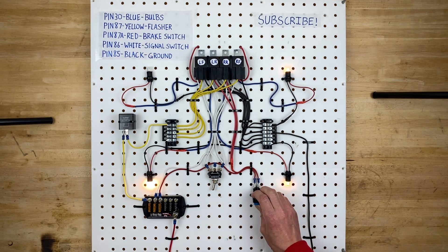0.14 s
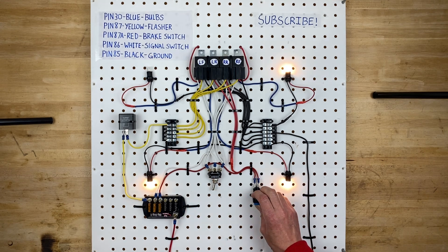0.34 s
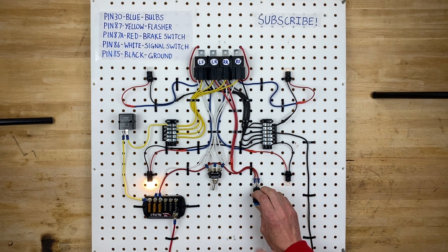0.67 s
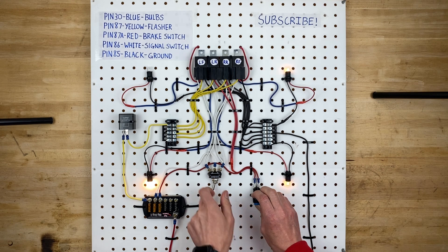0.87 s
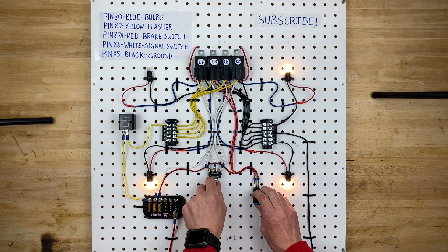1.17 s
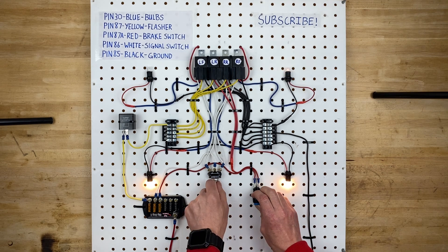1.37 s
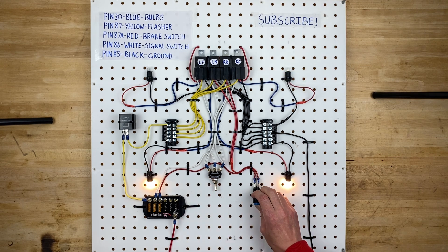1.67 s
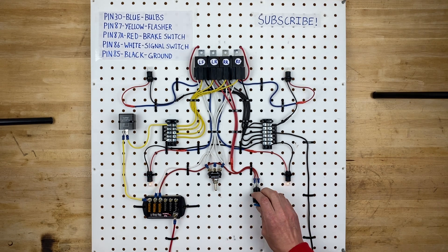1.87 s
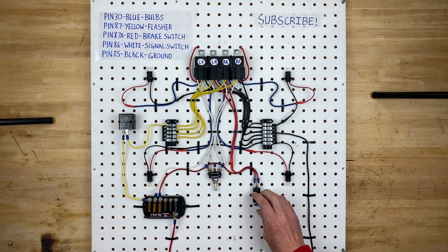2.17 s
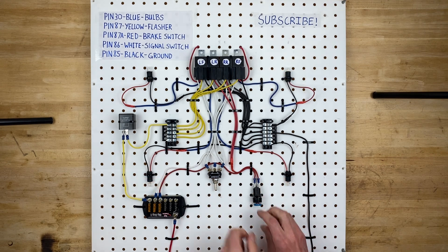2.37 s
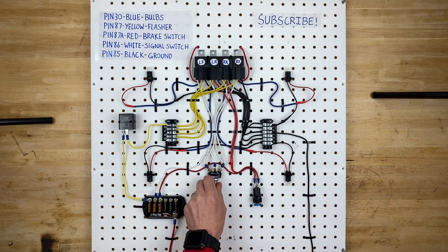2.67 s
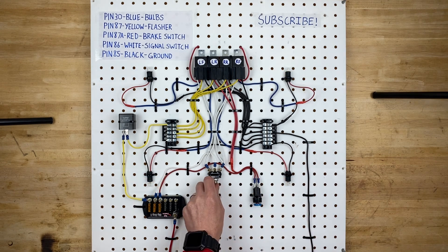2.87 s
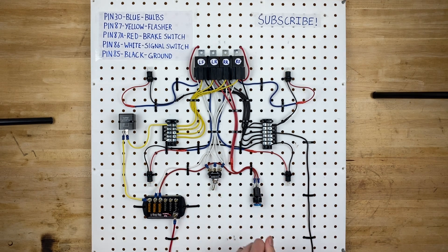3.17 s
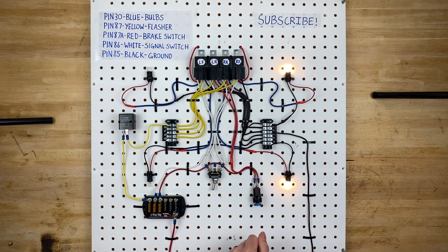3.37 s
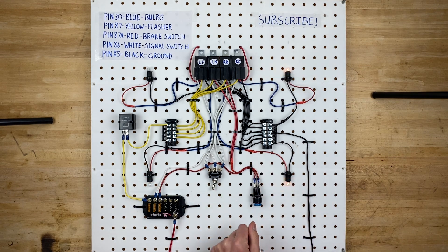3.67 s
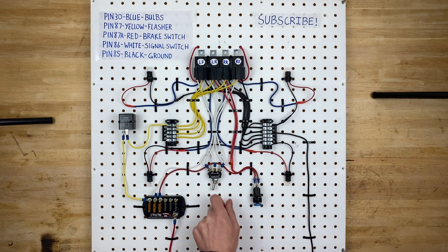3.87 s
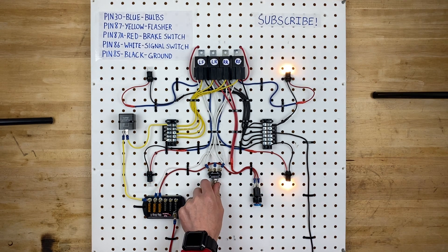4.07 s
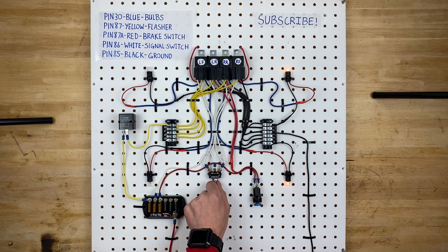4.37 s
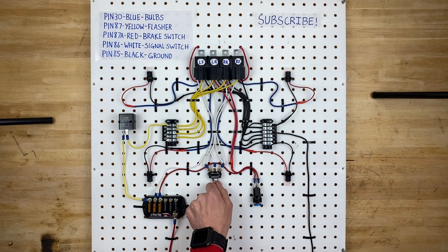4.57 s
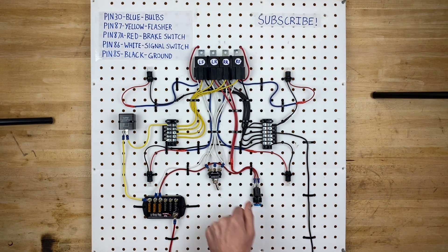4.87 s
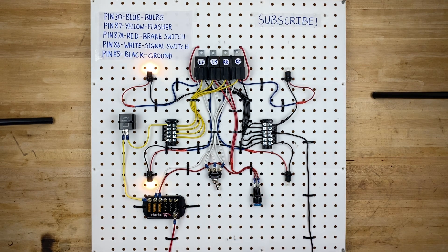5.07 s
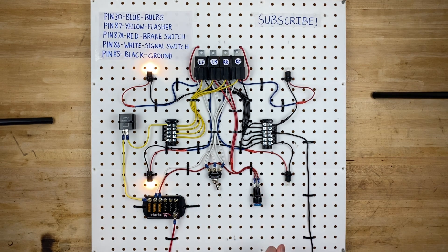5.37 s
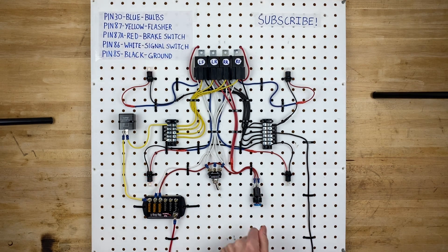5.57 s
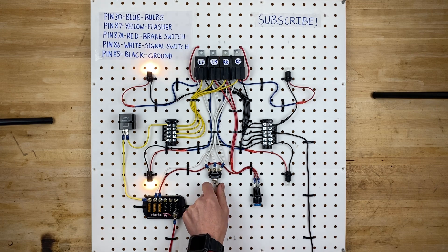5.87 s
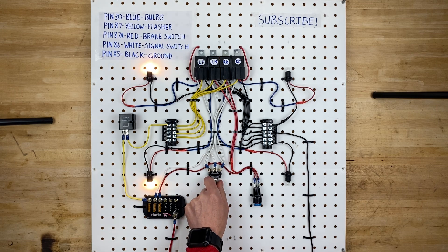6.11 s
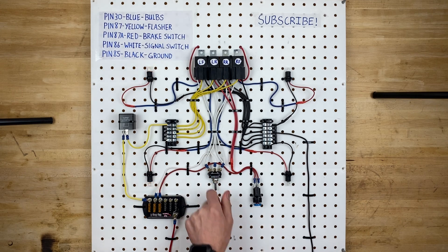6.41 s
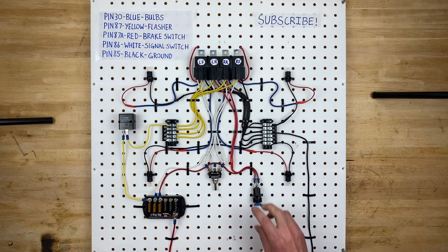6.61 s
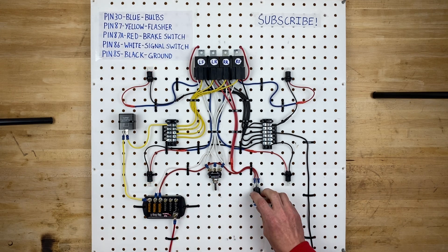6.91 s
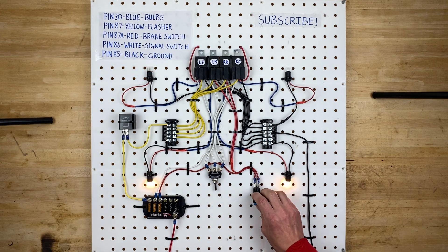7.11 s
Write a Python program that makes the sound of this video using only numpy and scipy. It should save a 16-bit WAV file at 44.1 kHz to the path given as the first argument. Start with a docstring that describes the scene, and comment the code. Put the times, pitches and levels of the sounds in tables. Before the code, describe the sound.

Close-miked wiring board on a bench: soft arm thuds first, then light fingertip knocks and the first crisp, metallic switch clack. More throws follow, each with a slightly different bright ring, a quick pair past the middle and a strongest one late. Small skin scrapes and nail ticks fall between. A faint, rough, very high electrical whine, low air rumble and hiss stay constant in a small quiet room.

```python
"""From the start a mains power supply whines high up, over ventilation rumble and a faint hiss. An arm
leaning on the bench thuds softly at 0.6 s, 0.9 s and 6.7 s. From 1.1 s fingers tap a perforated wiring board.
A metal toggle switch on it is thrown by hand at 1.3, 2.8, 4.4, 4.7 and 6.2 s: each throw makes many decaying
tones ring. The whine is sines swept by a voltage ripple, the air is shaped noise, and a quiet room adds a tail."""
import sys
import numpy as np
from scipy import signal
from scipy.fft import rfft, irfft
from scipy.io import wavfile
from scipy.ndimage import uniform_filter1d

SR = 44100
rng = np.random.default_rng(int(sys.argv[2]) if len(sys.argv) > 2 else 0)


def put_to_file(sound):
    """Save the sound as 16-bit audio at rate SR, in the file named by the first command-line argument."""
    columns = np.atleast_2d(sound).T  # one column per channel
    safe = np.clip(columns, -1, 1)
    whole_steps = np.round(safe * 32767)
    wavfile.write(sys.argv[1], SR, whole_steps.astype(np.int16))


N = 319725


def from_db(db):
    """Turns decibels into an amplitude factor."""
    return 10 ** (np.asarray(db) / 20)


def at_hz(points, hz):
    """Reads a table between its rows, on a log-frequency axis."""
    table = np.array(points)
    return np.interp(np.log(hz), np.log(table[:, 0]), table[:, 1])


# loudness of ventilation rumble and hiss at each pitch: [f/Hz, relative level per Hz/dB]
AIR = [(12, -27), (20, 0), (50, -8), (77, -1.5), (100, -7.5), (140, -9.5), (285, -15.5), (950, -27.5),
       (2000, -35), (4800, -40), (10800, -40), (15000, -43), (16200, -51.5)]
AIR_DB = -65   # rms of the whole


def air():
    """Moving air makes steady noise, here random noise shaped by its spectrum."""
    hz = np.maximum(np.fft.rfftfreq(N, 1 / SR), 1)
    spectrum = rfft(rng.standard_normal(N))
    noise = irfft(spectrum * from_db(at_hz(AIR, hz)) * (hz > 10), N)
    return from_db(AIR_DB) * noise / noise.std()


RIPPLE_HZ, FIRST_CREST_S = 119.967, -.0001
FLAT_TOP = .09   # the mains wave is flattened over this share of a ripple either side of its crest
SAG, HOLD = .55, 0.06   # voltage decay per ripple; share of a ripple before it starts
ROUNDING_S = 0.00027   # the voltage is averaged over this time


def voltage_drop(since):
    """The smoothing capacitor follows the rectified mains up to each crest, then sags until it is recharged."""
    sagging = np.exp(-SAG * np.maximum(since - HOLD, 0))
    mains = np.minimum(np.abs(np.cos(np.pi * since)) / np.cos(np.pi * FLAT_TOP), 1)
    rising_mains = mains * (since > .5)
    drop = 1 - np.maximum(rising_mains, sagging)
    return uniform_filter1d(drop, size=round(ROUNDING_S * SR))


# base pitch of the whine at the ripple crest: [t/s, f/Hz]
CREST_PITCH = [(0, 8815), (1.0, 8823), (3.0, 8805), (4.8, 8785), (5.0, 8820), (5.22, 8960), (5.98, 9005),
               (6.3, 8940), (7.25, 8935)]
# starts of brief dips in pitch, as under a passing load: [t/s]
LOADS = [.39, 1.10, 1.83, 2.50, 3.16, 3.83, 4.52, 5.17, 5.87, 6.60]
LOAD_S, LOAD_DROP_HZ = .085, 67
# chance in the whine's pitch: [spread f/Hz, changes per s]
WAVERS = [(6, 3.1), (14, 150.0)]
SWING_HZ, UNEVEN_HZ = 8580, 75   # pitch lost per unit of voltage drop; up or down on alternate crests
# as charging starts the whine falters and its pitch plunges: centre and width as shares of a ripple
RECHARGE, RECHARGE_WIDTH = .735, .04
RECHARGE_DIP_DB, PLUNGE_HZ = 9.5, 600
# the two whining tones: [f above the sweep/Hz, level at the crest/dB, loss per squared unit of voltage drop/dB]
WHINES = [(0, -57.5, 169.5), (1023, -64.5, 46)]
# thin steady tones: [f/Hz, rms level/dB]
HUM = [(1001, -89.5), (1502, -94.5), (3004, -101)]


def supply():
    """The pitch and loudness of the whine follow the rippling capacitor voltage; steady tones lie beside it."""
    t = np.arange(N) / SR
    turns = (t - FIRST_CREST_S) * RIPPLE_HZ
    since = turns % 1   # share of a ripple gone since its crest
    drop = voltage_drop(since)
    charging = np.exp(-((since - RECHARGE) / RECHARGE_WIDTH) ** 2)

    sweep = np.interp(t, *np.transpose(CREST_PITCH))
    sweep = sweep - LOAD_DROP_HZ * sum((t > s) & (t < s + LOAD_S) for s in LOADS)
    sweep = sweep - UNEVEN_HZ * np.cos(np.pi * turns)   # the two half-waves of the mains differ
    sweep = sweep - SWING_HZ * drop - PLUNGE_HZ * charging
    for spread_hz, rate in WAVERS:
        # 1000 random points; after the last one the value stays put
        waver = np.interp(t * rate, np.arange(1000), rng.standard_normal(1000))
        sweep = sweep + spread_hz * waver

    out = np.zeros(N)
    for hz, db, loss_db in WHINES:
        cycles = np.cumsum(sweep + hz) / SR + rng.random()
        out += from_db(db - loss_db * drop ** 2) * np.sin(2 * np.pi * cycles)
    out *= from_db(-RECHARGE_DIP_DB * charging)
    for hz, db in HUM:
        out += np.sqrt(2) * from_db(db) * np.sin(2 * np.pi * (hz * t + rng.random()))
    return out


def ring(push, hz, t60):
    """A mode: a unit click sets a sine of height 1 ringing, which fades by 60 dB in t60 seconds."""
    r, w = from_db(-60 / (t60 * SR)), 2 * np.pi * hz / SR
    return signal.lfilter([0, np.sin(w)], [1, -2 * r * np.cos(w), r * r], push)


def add(out, s, peak_db, sound):
    """Places a sound at a time; its loudest 3 ms set the approximate peak."""
    i = round(s * SR)
    loudest = 2.5 * np.sqrt(uniform_filter1d(sound ** 2, size=130).max())
    out[i:i + len(sound)] += (from_db(peak_db) * sound / loudest)[:N - i]


# arm leaning on the bench: [t/s, peak level/dB]
THUDS = [(0.609, -48), (0.899, -42.5), (6.669, -50.5)]
BENCH_HZ, BENCH_T60_S = 30, 0.45


def bench():
    """A soft push of the arm sets the bench swinging at one low pitch."""
    out = np.zeros(N)
    push = np.append(np.hanning(600), np.zeros(12000))
    for s, db in THUDS:
        add(out, s, db, ring(push, BENCH_HZ, BENCH_T60_S))
    return out


RISE_S, SPIKY_DB = .0003, 5.5   # swell of a rattle; spread of its single contacts


def burst(length_s, size):
    """Uneven tiny contacts swell at once and die with the given time constant."""
    t = np.arange(size) / SR
    contacts = rng.standard_normal(size) * from_db(SPIKY_DB * rng.standard_normal(size))
    return contacts * np.exp(-t / length_s) * (1 - np.exp(-t / RISE_S))


def highpass(x, hz):
    """Weakens what lies below a pitch."""
    return signal.sosfilt(signal.butter(4, hz, "high", fs=SR, output="sos"), x)


BOARD_BOTTOM_HZ = 505   # the ringing weakens below this


def struck(modes, rattle_s, crack_db, crack_s):
    """A short rattle of contacts drives every mode (dB = height of its spectral peak); a broad crack lies on top."""
    body = np.zeros(6000)
    for hz, db, t60 in modes:
        tone = ring(burst(rattle_s, size=6000), hz, t60)
        body += from_db(db) / np.sqrt(t60) * tone / tone.std()
    body = highpass(body, BOARD_BOTTOM_HZ)
    crack = highpass(burst(crack_s, size=6000), 900)
    return body / body.std() + from_db(crack_db) * crack / crack.std()


# ringing modes of the wiring board, also knocked by the switch: [f/Hz, relative level/dB, t60/s]
BOARD = [(860, 9, 0.023), (1396, 4.5, 0.01), (2050, 0.5, 0.013), (2310, -13, 0.0081), (3937, -25.5, .01)]
# finger touches: [t/s, peak level/dB, scrape colour f/Hz, kind of touch]
TOUCHES = [(1.089, -52, 2460, "pad"), (1.192, -60.5, 1580, "slide"), (1.229, -60.5, 1995, "pad"),
           (1.416, -54.5, 890, "pad"), (1.824, -53, 2370, "nail"), (1.863, -49, 1890, "pad"),
           (2.295, -56.5, 2180, "pad"), (2.594, -46, 2570, "knuckle"), (2.628, -51, 5200, "nail"),
           (2.649, -56, 1868, "slide"), (2.702, -55.5, 1782, "pad"), (2.721, -58.5, 6100, "slide"),
           (4.101, -47, 1505, "pad"), (4.138, -56.5, 1500, "slide"), (4.248, -61, 1110, "pad"),
           (6.055, -39, 1530, "knuckle"), (6.111, -63, 3000, "pad"), (6.976, -64.5, 1886, "slide"),
           (7.087, -53, 2440, "nail")]
# how each kind of touch sounds: [treble tick level/dB, scrape level/dB, rub time constant/s]
TOUCH_KINDS = {"pad": (-25, 5, 0.0052), "slide": (-19, 6.2, 0.026), "nail": (6.2, 2.3, 0.0088),
               "knuckle": (-29, -4, 0.0041)}


def fingers():
    """Each touch knocks softly on the board, with a coloured scrape of skin and a tick of nail."""
    out = np.zeros(N)
    for s, db, colour_hz, kind in TOUCHES:
        tick_db, scrape_db, rub_s = TOUCH_KINDS[kind]
        scrape = (colour_hz, scrape_db, 2.3 / colour_hz)   # a broad resonance of a few cycles
        add(out, s, db, struck(BOARD + [scrape], rub_s, -12.5, rub_s))
        tick = np.diff(burst(.006, size=3000), n=2)   # differencing keeps mostly treble
        add(out, s, db + tick_db, tick)
    return out


# contacts of the lever: [t/s, peak level/dB, contact, throw]
SNAPS = [(1.2782, -19, "stop", "right-centre"), (1.287, -29, "rebound", "right-centre"),
         (2.78, -37, "release", "centre-right"), (2.785, -28, "release", "centre-right"),
         (2.7875, -17, "stop", "centre-right"), (4.3586, -18.5, "stop", "right-centre"),
         (4.377, -30.5, "rebound", "right-centre"), (4.651, -36, "release", "centre-left"),
         (4.6605, -16, "stop", "centre-left"), (6.153, -13, "stop", "left-centre"),
         (6.181, -36, "rebound", "left-centre")]
# which way the lever goes, in the order of the mode strengths: [throw]
THROWS = ["right-centre", "centre-right", "centre-left", "left-centre"]
# ringing modes of switch and board: [f/Hz, t60/s, then relative level/dB in each of the four throws]
SWITCH = [(821, 0.07, -11.5, -26, -18, -17), (1015, 0.07, -11.5, -8.5, -22.5, -13),
          (1660, 0.01, -26, -10.5, -41, -37.5), (2230, 0.045, -24, -40, -9, -10.5),
          (2434, 0.046, -21.5, -13, 2.5, -3.5), (2775, 0.013, -12.5, -6, -8, -6.5),
          (2985, 0.03, -24, -3, 3.5, 3), (3380, 0.021, 2, -4.5, -16, -23),
          (3585, 0.057, -2.5, -34, -20, -15), (3840, 0.04, -1, -7, -4, -3.5), (4130, 0.04, 1, -17, -33, -7),
          (4280, 0.024, -1.5, -27, -22.5, -32.5), (4850, 0.0279, -16, -3.5, -6, -10),
          (5396, 0.022, -10.5, 4, 3.5, -8.5), (6500, 0.014, -11, -9, -2.5, -9),
          (7480, 0.0038, -8.5, 0.5, -26, -23), (7780, 0.0094, -19, -2, -31, -19),
          (7930, 0.042, -21.5, 2, -7.5, -4), (8060, 0.027, -9.5, 7.5, -6.5, -1.5),
          (8640, 0.042, -10.5, 3, 2.5, -12), (9280, 0.015, -20, -12, -3, -13),
          (9990, 0.025, -11, -3, -1.5, -4.5), (11034, 0.02, -11, -1, 2.5, -13.5),
          (11580, 0.0047, -18, -31, -8.5, -6.5), (12000, 0.0097, -16, -5, -19.5, -12.5),
          (13630, 0.02, -22, 2, 4, -11), (13430, 0.014, -11, -10, -11, -9.5),
          (14840, 0.014, -12.5, -23, -24, -8), (16080, 0.014, -10, -26, -18.5, -4.5)]
# the spring lets go, the lever hits its stop, it bounces back:
# [base rattle time/s, crack level/dB, knock in the board relative to the snap/dB]
CONTACTS = {"release": (0.0072, 2.5, -23.5), "stop": (0.0066, -13, -33.5), "rebound": (0.005, 0, -10)}
# what the board radiates to the walls in each throw, before its treble is weakened: [level relative to the snap/dB]
RADIATED_DB = [-15.5, -16, -19, -17.5]
SMEAR = 5.0   # the board's many small modes smear the rings: they die this many times sooner
BOARD_TOP_HZ = 6000   # the board radiates little above this


def switch():
    """Each throw lands on another stop, so the same modes ring with other strengths; gives direct and radiated sound."""
    direct, radiated = np.zeros((2, N))
    for s, db, contact, throw in SNAPS:
        way = THROWS.index(throw)
        rattle_s, crack_db, knock_db = CONTACTS[contact]
        modes = [(hz, strengths[way], t60) for hz, t60, *strengths in SWITCH]
        add(direct, s, db, struck(modes, 0.51 * rattle_s, crack_db, 1.5 * rattle_s))
        add(direct, s, db + knock_db, struck(BOARD, rattle_s, -15.5, rattle_s))
        smeared = [(hz, strength_db, t60 / SMEAR) for hz, strength_db, t60 in modes]
        add(radiated, s, db + RADIATED_DB[way], struck(smeared, rattle_s, -12.5, rattle_s))
    return direct, signal.lfilter(*signal.butter(1, BOARD_TOP_HZ, fs=SR), radiated)


# how long the room's tail lasts at each pitch: [f/Hz, t60/s]
ROOM = [(400, 0.49), (1500, 0.13), (3700, 0.34), (8000, .2), (15000, 0.4)]


def room(x):
    """Many wall echoes form a dense tail, dying band by band, that builds up over the first 9.2 ms."""
    t = np.arange(SR // 2) / SR
    tail = np.zeros(len(t))
    edges = np.geomspace(300, 17000, num=11)
    for low, high in zip(edges, edges[1:]):
        band_filter = signal.butter(2, [low, high], "band", fs=SR, output="sos")
        band = signal.sosfilt(band_filter, rng.standard_normal(len(t)))
        tail += band * from_db(-60 * t / at_hz(ROOM, np.sqrt(low * high)))
    tail *= np.clip(t / 0.0092, 0, 1)
    return signal.fftconvolve(x, tail / np.sqrt(np.sum(tail ** 2)))[:N]


TOUCH_ROOM_DB, WHINE_ROOM_DB = -11, -17.5   # touches (with thuds) and whine sent to the walls


def scene():
    """Switch, fingers, bench and whine sound in the room; the air lies under them."""
    whine = supply()
    touches = bench() + fingers()
    snaps, radiated = switch()
    sent = radiated + from_db(TOUCH_ROOM_DB) * touches + from_db(WHINE_ROOM_DB) * whine
    return (snaps + touches + whine + room(sent) + air())[None]


CUTOFF_HZ = 16800   # from here up everything is at least 70 dB weaker


def record(dry):
    """A steep low-pass filter cuts off the top treble."""
    return signal.sosfilt(signal.cheby2(14, 70, CUTOFF_HZ, fs=SR, output="sos"), dry)


dry = scene()
out = record(dry)
put_to_file(out)
```